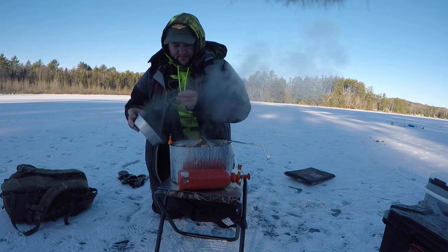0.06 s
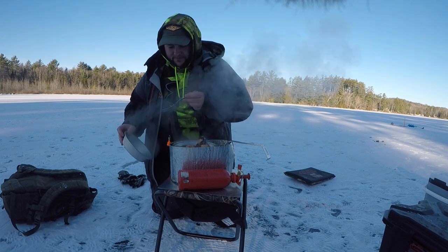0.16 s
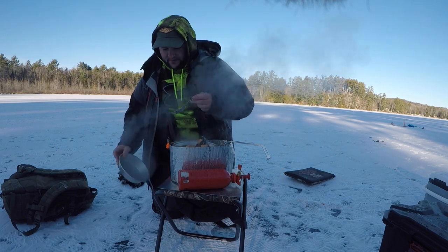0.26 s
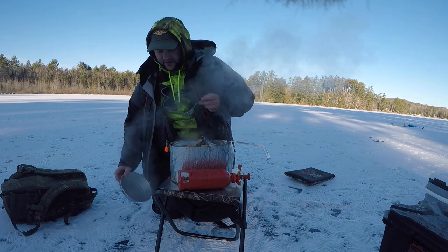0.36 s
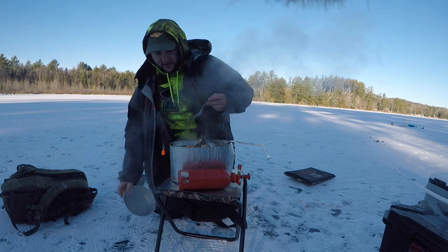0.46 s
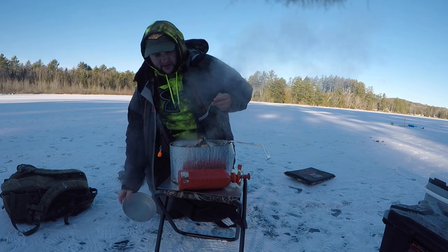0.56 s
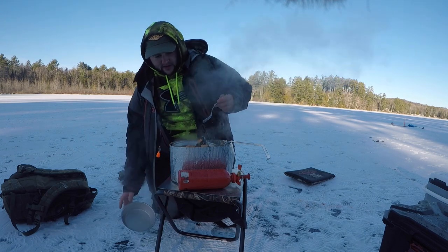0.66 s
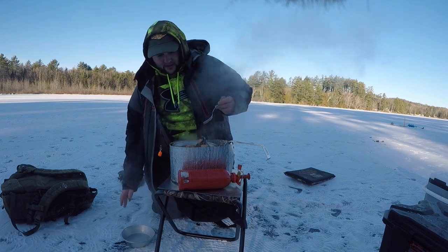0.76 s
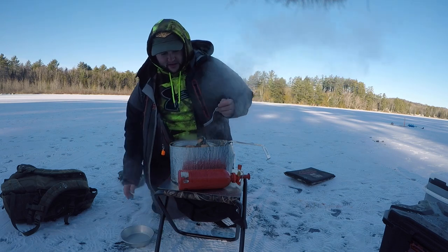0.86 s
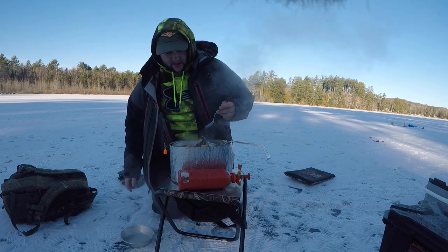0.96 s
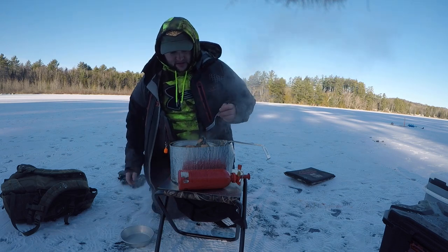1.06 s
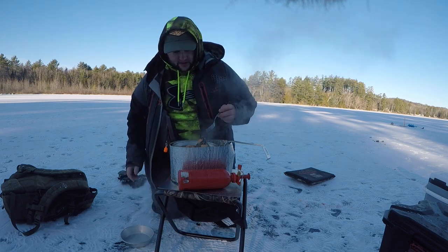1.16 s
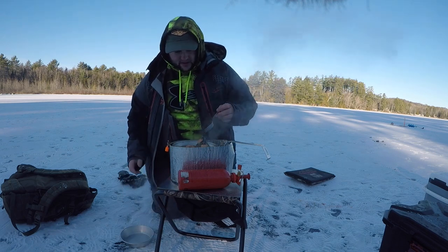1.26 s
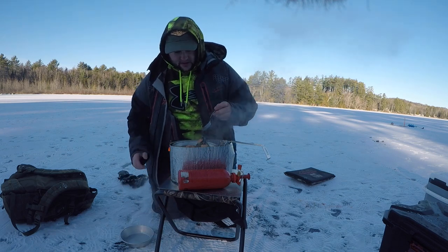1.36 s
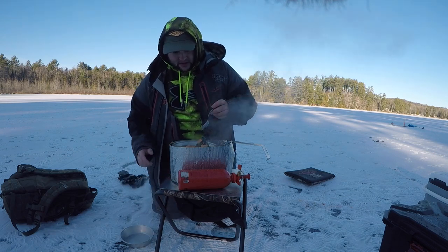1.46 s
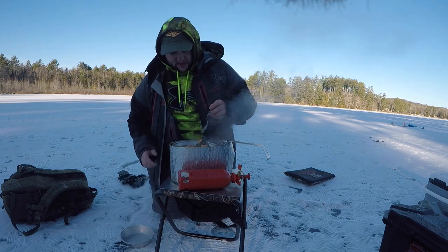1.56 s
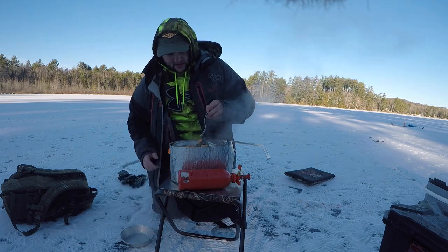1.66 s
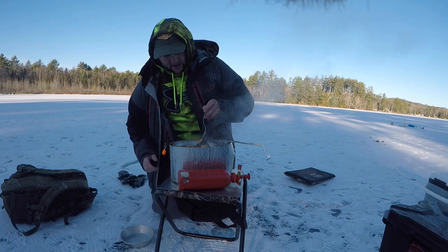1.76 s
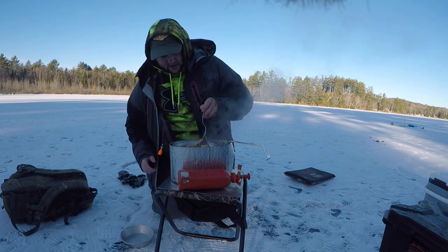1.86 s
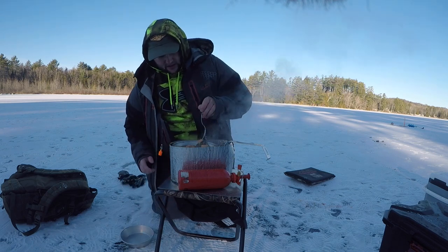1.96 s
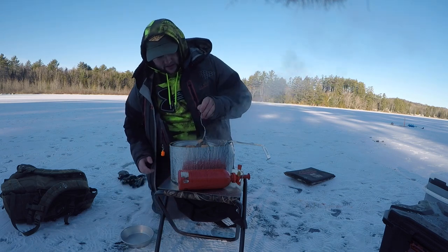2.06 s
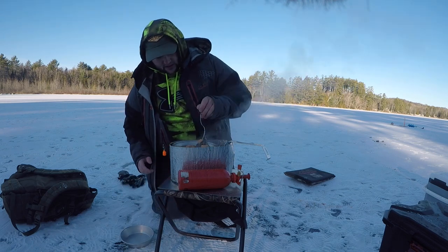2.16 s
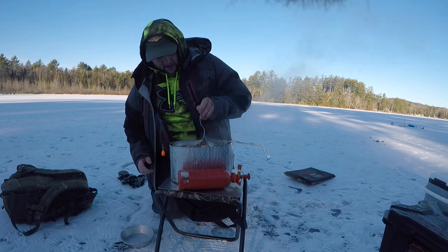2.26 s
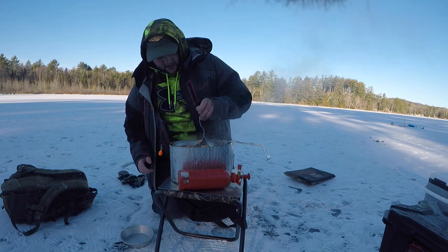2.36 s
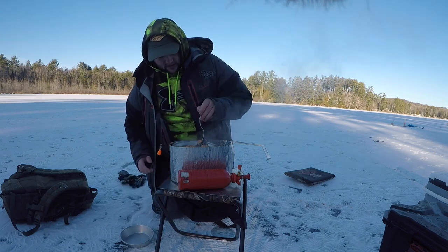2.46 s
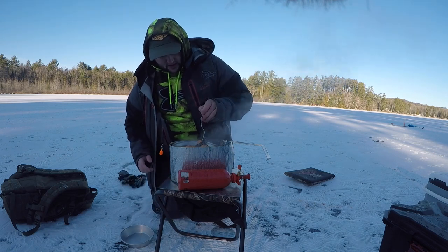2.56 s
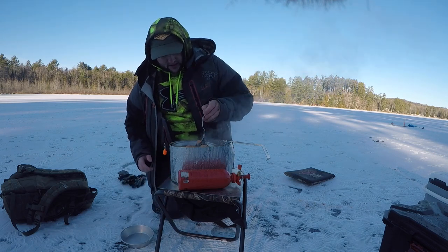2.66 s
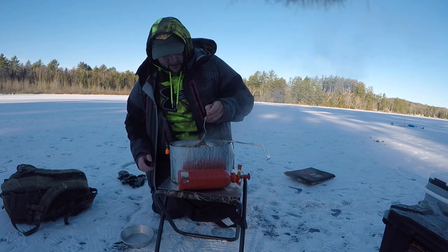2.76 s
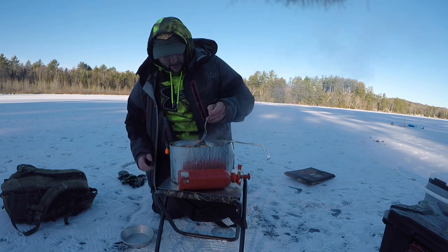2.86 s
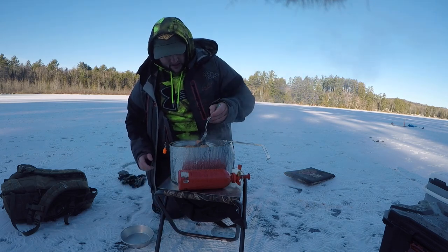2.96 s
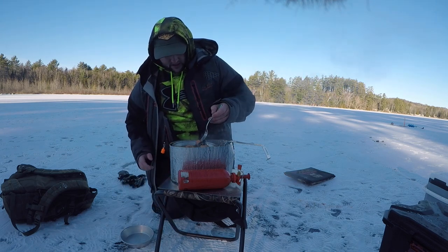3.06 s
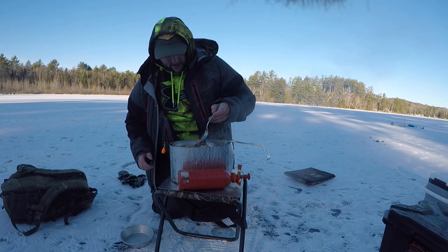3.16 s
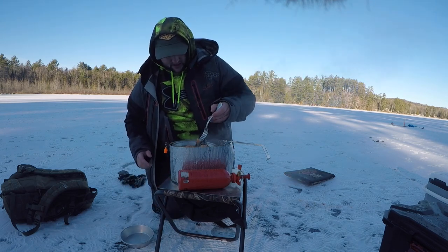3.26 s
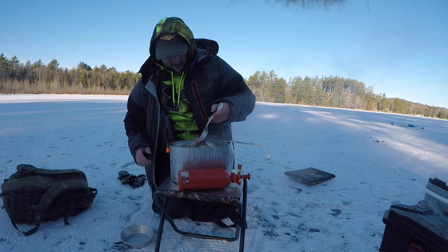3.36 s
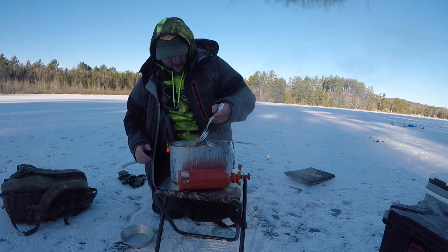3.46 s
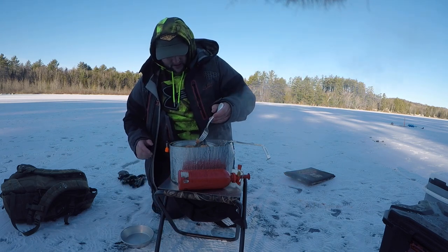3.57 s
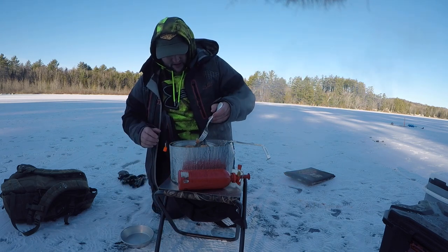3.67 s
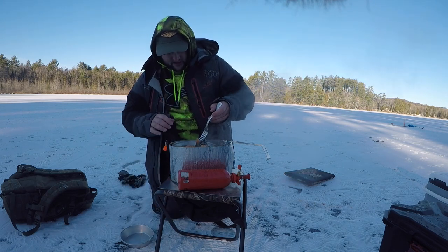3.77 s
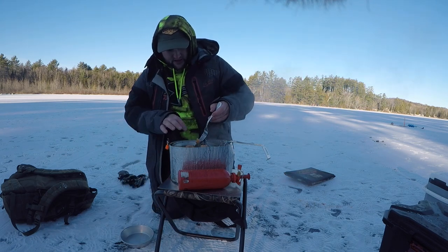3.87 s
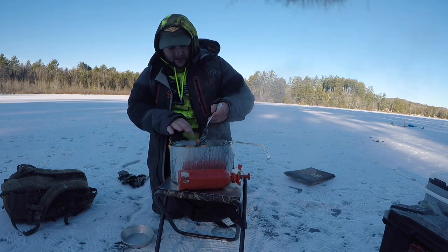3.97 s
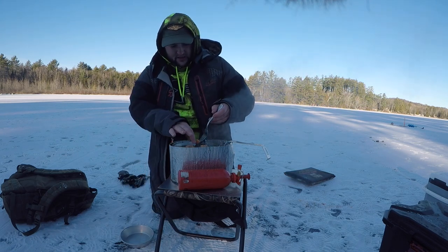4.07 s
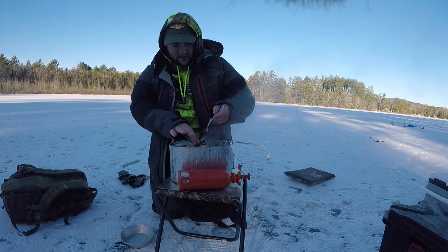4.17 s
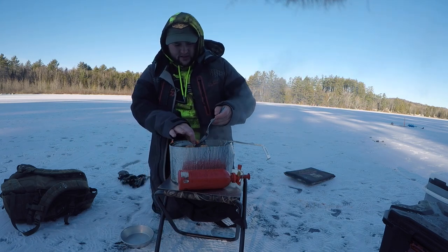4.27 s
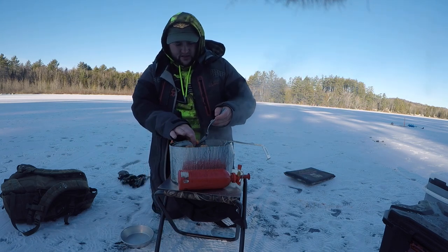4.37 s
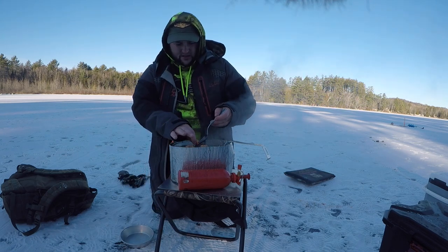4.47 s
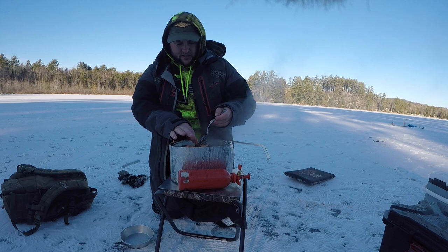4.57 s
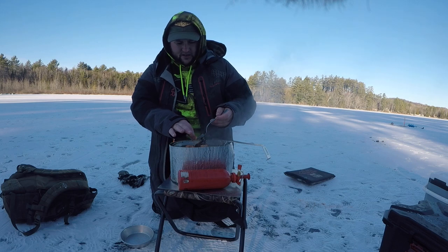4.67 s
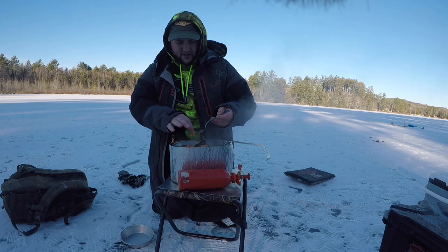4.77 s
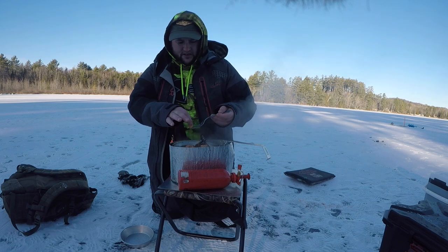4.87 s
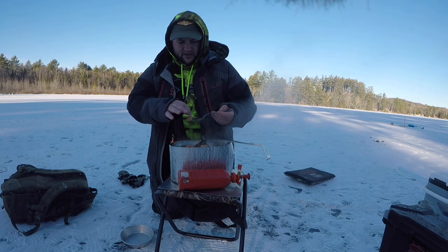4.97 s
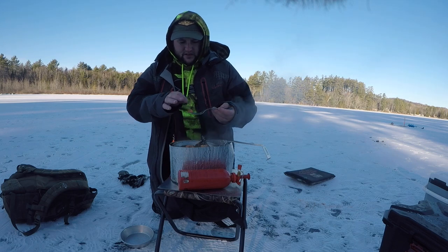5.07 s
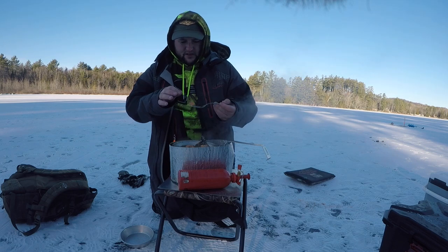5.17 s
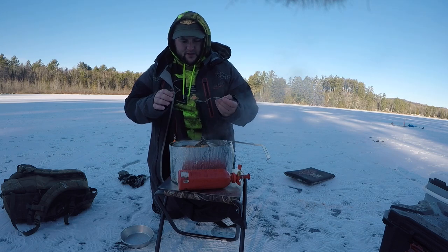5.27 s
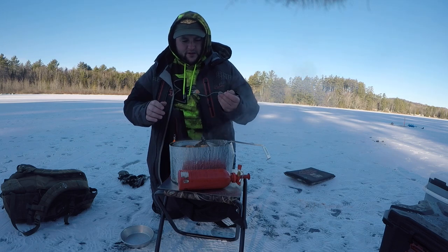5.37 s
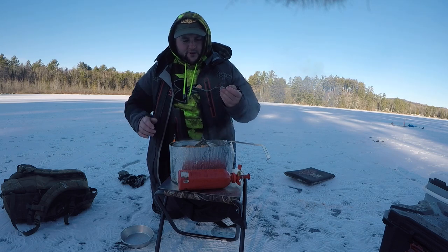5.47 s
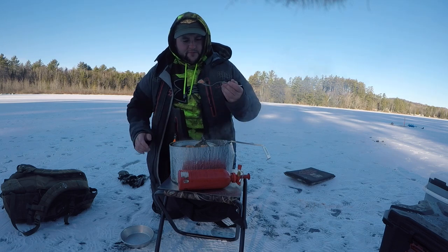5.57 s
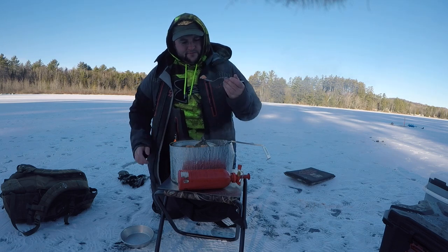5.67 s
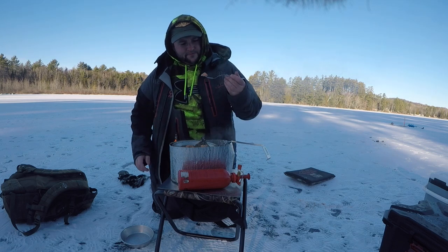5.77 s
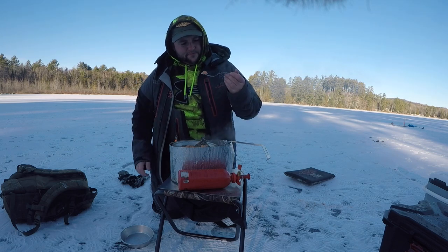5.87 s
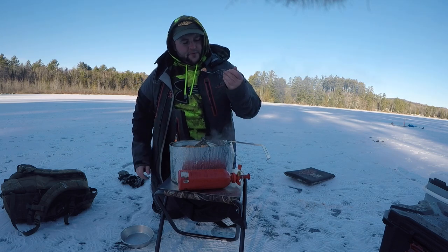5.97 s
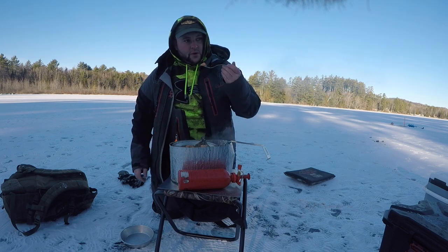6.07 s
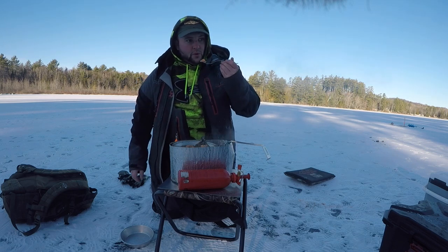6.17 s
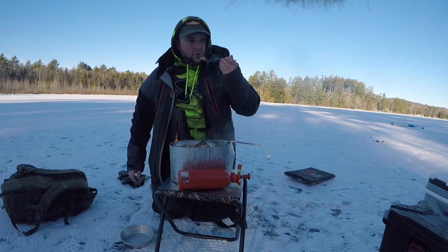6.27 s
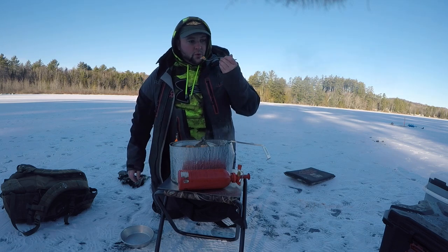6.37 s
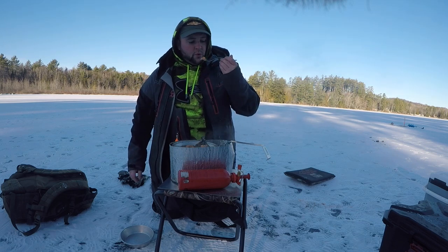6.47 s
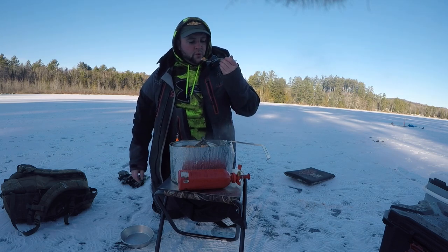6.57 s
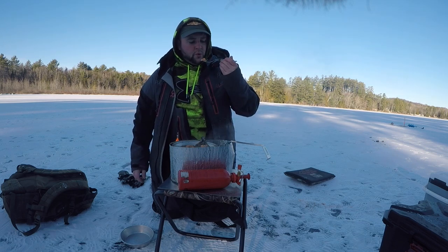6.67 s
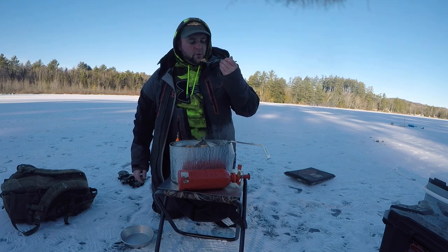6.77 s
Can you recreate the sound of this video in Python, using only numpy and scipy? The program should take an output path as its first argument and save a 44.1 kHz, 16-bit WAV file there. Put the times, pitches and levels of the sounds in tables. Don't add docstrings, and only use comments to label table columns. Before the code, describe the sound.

A camp stove roars steadily outdoors with a thin hiss on top; early on a metal lid clacks and bounces onto crusty snow.

```python
import sys
import numpy as np
from scipy import signal
from scipy.fft import rfft, irfft, next_fast_len
from scipy.io import wavfile
from scipy.ndimage import map_coordinates

SR = 44100
rng = np.random.default_rng(int(sys.argv[2]) if len(sys.argv) > 2 else 0)


def materialize(psi):
    bounded = np.clip(np.atleast_2d(psi).T, -1, 1)
    quanta = np.round(bounded * 32767).astype(np.int16)
    wavfile.write(sys.argv[1], SR, quanta)


def natural_amplitude(level_db):
    exponent = np.asarray(level_db, float) / 20
    return 10 ** exponent


N = 300321


def rms_one(x):
    return x / np.sqrt(np.mean(x ** 2) + 1e-20)


def drift(rate_hz):
    pole = np.exp(-2 * np.pi * rate_hz / SR)
    slow = signal.lfilter([1], [1, -2 * pole, pole * pole], rng.standard_normal(N + SR))
    return rms_one(slow[SR:])


def coloured(spectrum, cavities=()):
    size = next_fast_len(N)
    hz = np.arange(size // 2 + 1) * SR / size + 1
    table = np.array(spectrum)
    shape_db = np.interp(np.log(hz), np.log(table[:, 0]), table[:, 1])
    for centre_hz, width_hz, db in cavities:
        shape_db = shape_db + db / (1 + (2 * (hz - centre_hz) / width_hz) ** 2)
    shaped = rfft(rng.standard_normal(size)) * natural_amplitude(shape_db)
    return rms_one(irfft(shaped, size)[:N])


def band_noise(centre_hz, half_width_hz):
    edges_hz = [centre_hz - half_width_hz, centre_hz + half_width_hz]
    band = signal.butter(2, edges_hz, "band", fs=SR, output="sos")
    return rms_one(signal.sosfilt(band, rng.standard_normal(N)))


def swells(rest_db, rows):
    t = np.arange(N) / SR
    power = natural_amplitude(rest_db) ** 2
    for centre_s, length_s, db in rows:
        power = power + natural_amplitude(db) ** 2 * np.exp(-8 * ((t - centre_s) / length_s) ** 2)
    return np.sqrt(power)


def ring(clicks, hz, t60_s):
    r = natural_amplitude(-60 / (t60_s * SR))
    w = 2 * np.pi * hz / SR
    return signal.lfilter([0, np.sin(w)], [1, -2 * r * np.cos(w), r * r], clicks + 1e-18)


# time_s, level_db
FUEL_FLOW = [(0, -0.5), (.7, 0.6), (2, 0), (2.9, -.5), (3.5, .3), (4.6, -0.5), (5.05, .5), (5.4, -1.1),
             (5.8, 0), (6.81, 0.2)]


def fuel_flow_db():
    time_s, level_db = np.transpose(FUEL_FLOW)
    return np.interp(np.arange(N) / SR, time_s, level_db)


# frequency_hz, density_db (per Hz)
FLAME_SPECTRUM = [(7.1, -40), (12, -32), (19, -38), (38, -37), (149, -17.5), (214, -15.5), (293, -15),
                  (481, 3), (844, -23.5), (1160, -28.5), (1420, -24.5), (1550, -19.5), (1700, -27),
                  (1980, -30), (2600, -39), (3380, -67), (5720, -120)]
# centre_hz, width_hz, level_db
SCREEN_CAVITIES = [(460, 120, -0.5), (374, 30, 1.5), (212.3, 32.5, -9), (1482, 163, -5.5), (1568, 140, 5),
                   (1670, 55, -19), (1936, 99, 3.5), (2303, 33, 9.5), (2500, 130, -12)]


def roar(flow_db):
    level_db = -28.5 + flow_db + 0.1 * drift(5.7)
    return natural_amplitude(level_db) * coloured(FLAME_SPECTRUM, SCREEN_CAVITIES)


# centre_s, length_s, level_db
LEANS = [
    (2.3, 1.4, -56),
    (4.4, 2, -51.5),
    (5.55, .6, -54),
]


def throat():
    return swells(-56.5, LEANS) * natural_amplitude(.8 * drift(19)) * band_noise(1165, 60)


# centre_s, length_s, level_db
HOOT_SWELLS = [(.5, 0.51, -51), (1.25, .5, -52), (2.65, 0.83, -50.5), (3.85, 0.44, -54), (4.3, .5, -57),
               (4.95, 0.32, -53), (6.2, 1.2, -51.5)]


def hoot():
    return swells(-63, HOOT_SWELLS) * natural_amplitude(0.97 * drift(12)) * band_noise(1559, 49)


def off_the_cook(x):
    delay_s = .003 + .00008 * drift(0.47)
    echo = map_coordinates(x, [np.arange(N) - delay_s * SR], order=3, mode="wrap")
    return x + natural_amplitude(-13) * echo


# frequency_hz, density_db (per Hz)
JET_SPECTRUM = [(1060, -31.5), (1800, -0.5), (2230, 1), (2510, -11.5), (3230, -4.5), (4750, -19),
                (5480, -11.5), (6220, -18), (15400, -36.5)]
# centre_hz, width_hz, level_db
CUP_CAVITIES = [(2500, 84, -2), (2670, 100, 2), (2960, 140, -8), (3170, 390, 2), (4350, 250, 9.5),
                (4810, 190, -2), (5645, 620, 5), (5810, 110, -10.5), (6160, 350, -12), (6640, 130, 11),
                (6755, 160, -16), (10000, 300, -9), (10330, 230, 8), (12300, 790, 0)]
# centre_s, length_s, level_db (added to rest)
JET_FLARES = [
    (2.9, 0.13, -3),
    (3.75, 0.36, -2.5),
    (5.55, 0.27, -3),
]


def jet(flow_db):
    flutter_db = 0.6 * drift(22) + 1.73 * drift(135)
    level_db = -52.5 + 0.17 * flow_db + flutter_db
    hiss = off_the_cook(coloured(JET_SPECTRUM, CUP_CAVITIES))
    return natural_amplitude(level_db) * swells(0, JET_FLARES) * hiss


def stove():
    flow_db = fuel_flow_db()
    return roar(flow_db) + throat() + hoot() + jet(flow_db)


# centre_s, length_s, level_db
WHINE_SWELLS = [
    (2.55, 1.2, -77),
    (6.35, .4, -77),
]


def whine():
    return swells(-85, WHINE_SWELLS) * band_noise(12350, 220)


# centre_s, length_s, level_db
GUSTS = [(1.15, .4, -45), (1.7, .9, -49.5), (2.4, .5, -54), (4.6, 0.62, -47), (5.3, 0.47, -46),
         (6.1, .4, -45), (6.5, 0.45, -45)]


def breeze():
    return swells(-57.5, GUSTS) * drift(3)


# frequency_hz, density_db (per Hz)
WEAVE_SPECTRUM = [(3500, -12), (5000, -4), (6300, -8), (8200, -2), (9000, -13), (10000, -16), (11500, -32)]
# frequency_hz, density_db (per Hz)
SHEEN_SPECTRUM = [(8500, -25), (10200, -9.5), (12200, 2), (13500, -4), (15400, -6)]
# centre_s, length_s, weave_db, sheen_over_weave_db
SLEEVE_STROKES = [
    (.42, .45, -61.5, -4),
    (1.298, .4, -64.5, -2),
    (2.5, .4, -76, -3),
    (3.72, 0.47, -61, -4),
    (5.35, 0.68, -71, -4),
    (5.85, .45, -65.5, -1),
]


def jacket():
    weave_rows = [(s, length, db) for s, length, db, _ in SLEEVE_STROKES]
    sheen_rows = [(s, length, db + over_db) for s, length, db, over_db in SLEEVE_STROKES]
    weave = swells(-66.5, weave_rows) * coloured(WEAVE_SPECTRUM)
    sheen = swells(-71, sheen_rows) * coloured(SHEEN_SPECTRUM)
    grains = natural_amplitude(0.5 * drift(300) + 0.9 * drift(25))
    return grains * (weave + sheen)


# start_s, peak_db, pitch_hz, t60_s
TICK_EVENTS = [
    (.425, -50, 7200, .03),
    (0.4654, -34, 2500, .004),
    (.467, -35, 5000, .003),
    (.548, -50, 14300, .008),
    (2.3336, -49, 3280, .01),
    (4.784, -44, 3190, .01),
    (3.77, -55, 13000, .008),
    (5.27, -52, 7200, .02),
]


def ticks():
    out = np.zeros(N)
    click = np.eye(1, SR // 10)[0]
    for start_s, peak_db, pitch_hz, t60_s in TICK_EVENTS:
        spot = out[round(start_s * SR):][:len(click)]
        spot += natural_amplitude(peak_db) * ring(click, pitch_hz, t60_s)[:len(spot)]
    return out


def struck(modes, rise_s):
    starts = (rise_s * SR * rng.uniform(.4, 1.5, len(modes))).astype(int)
    out = np.zeros(SR // 5)
    for k, ((hz, db, t60_s), at) in enumerate(zip(modes, starts)):
        click = np.eye(1, SR // 5, at)[0]
        out += (-1) ** k * natural_amplitude(db) * ring(click, hz, t60_s)
    return out


# start_s, crunch_peak_db, ring_db, clack_db, thump_db, rise_s
LANDINGS = [
    (0.6908, -21, -36.5, -24, -22, .0025),
    (0.7256, -22.5, -48, -26, -27, 0.0036),
    (0.7608, -42, -60, -47, -36, .002),
]
# frequency_hz, density_db (per Hz)
CRUST_SPECTRUM = [(300, -14), (900, 6), (2000, 0), (4200, -8), (7500, -12), (9800, -10.5), (13000, -10),
                  (15000, -14), (15900, -50)]
# pitch_hz, level_db, t60_s
RING_MODES = [(2903, -3, .15), (3800, -9, .06), (4745, -6, .09), (4971, 0, .17), (5207, -1, .2),
              (5440, -9, .05), (6027, -4, .09), (6750, -11, .08), (6965, -4, .09), (7335, -6, .08),
              (7455, -8, .07), (8450, -6, .06), (9330, -8, .06), (10900, -10, .06), (11700, -11, .06),
              (12400, -7, .06), (13500, -10, .06)]
# pitch_hz, level_db, t60_s
CLACK_MODES = [(1900, -17, .015), (2360, -17, 0.014), (3700, -11.5, 0.021), (5270, -12, 0.019),
               (7200, -7, 0.04), (7940, -2.5, 0.016), (8300, -1, 0.014), (9300, -11, 0.017),
               (10900, -19, .02), (12800, -16, .015), (13500, -8, .012)]
# pitch_hz, level_db, t60_s
BOWL_MODES = [(370, 1.5, 0.18), (257, -11.5, 0.068), (650, -8, 0.077), (1176, 1, 0.016), (1310, -10, 0.054)]


def lid():
    out = np.zeros(N)
    crust = coloured(CRUST_SPECTRUM)
    t = np.arange(SR // 5) / SR
    ends_s = [row[0] for row in LANDINGS[1:]] + [LANDINGS[-1][0] + .02]
    soft = signal.butter(2, [130, 1800], "band", fs=SR, output="sos")
    for (start_s, crunch_db, ring_db, clack_db, thump_db, rise_s), end_s in zip(LANDINGS, ends_s):
        at = round(start_s * SR)
        push = t / rise_s * np.exp(1 - t / rise_s)
        tail = 0.48 * np.minimum(t / rise_s, 1) * natural_amplitude(-60 * t / 0.14)
        crunch = natural_amplitude(crunch_db - 10.5) * crust[at:at + len(t)] * (push ** 3.6 + tail)
        ringing = natural_amplitude(ring_db) * struck(RING_MODES, rise_s)
        thump = natural_amplitude(thump_db) * signal.sosfilt(soft, struck(BOWL_MODES, 1.61 * rise_s))
        clack = natural_amplitude(clack_db) * struck(CLACK_MODES, rise_s)
        damping = natural_amplitude(-60 * np.maximum(t - (end_s - start_s), 0) / 0.07)
        out[at:at + len(t)] += crunch + (ringing + thump) * damping + clack
    return out


# frequency_hz, density_db (per Hz)
SKID_SPECTRUM = [(1500, -7), (2700, 2), (4000, -4), (6000, -17), (7600, 4), (8600, -1), (9500, -19),
                 (12500, -14), (14500, -26)]


def skid():
    start_s, peak_s, end_s = .732, .76, .775
    rise_db_per_s, fall_db_per_s = 200, 500
    t = np.arange(N) / SR
    late = t - peak_s
    level_db = -46.5 + np.where(late < 0, rise_db_per_s * late, -fall_db_per_s * late)
    outside_s = np.maximum(t - end_s, 0) + np.maximum(start_s - t, 0)
    level_db = level_db - 3000 * outside_s
    return natural_amplitude(level_db + 3.5 * drift(200)) * coloured(SKID_SPECTRUM)


def scene():
    top = signal.ellip(12, .5, 60, 15300, fs=SR, output="sos")
    steady = signal.sosfilt(top, stove() + jacket())
    return (steady + whine() + breeze() + ticks() + lid() + skid())[None]


def roll_off(x):
    return signal.sosfilt(signal.butter(12, 15650, fs=SR, output="sos"), x)


def record(dry):
    return roll_off(dry)


dry = scene()
out = record(dry)
materialize(out)
```